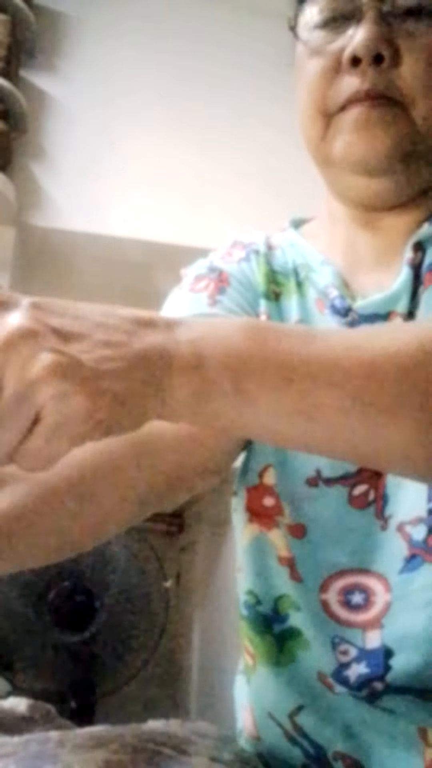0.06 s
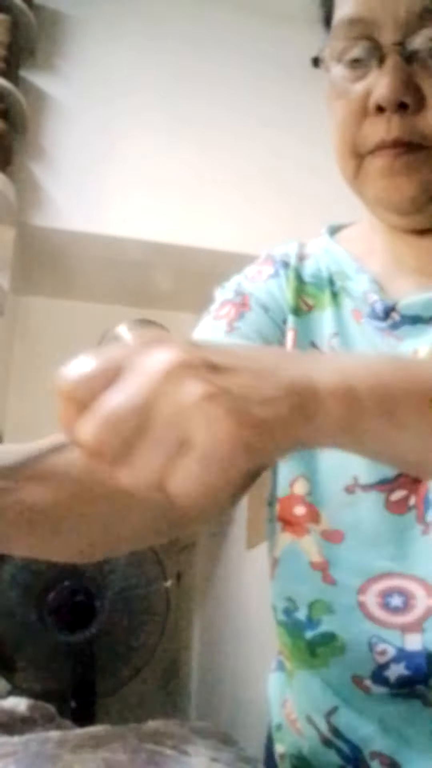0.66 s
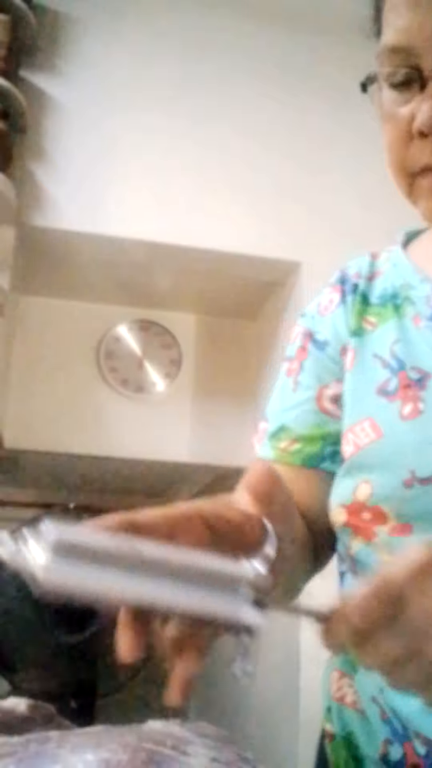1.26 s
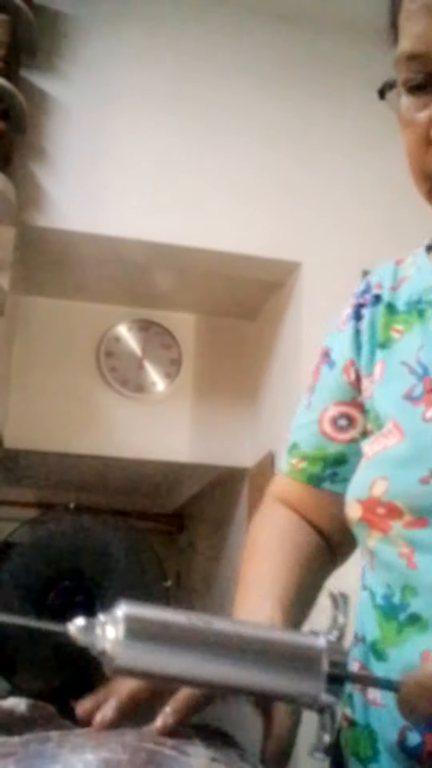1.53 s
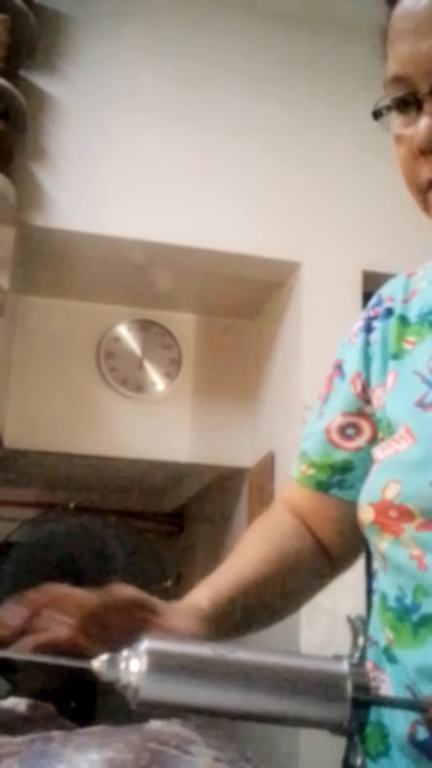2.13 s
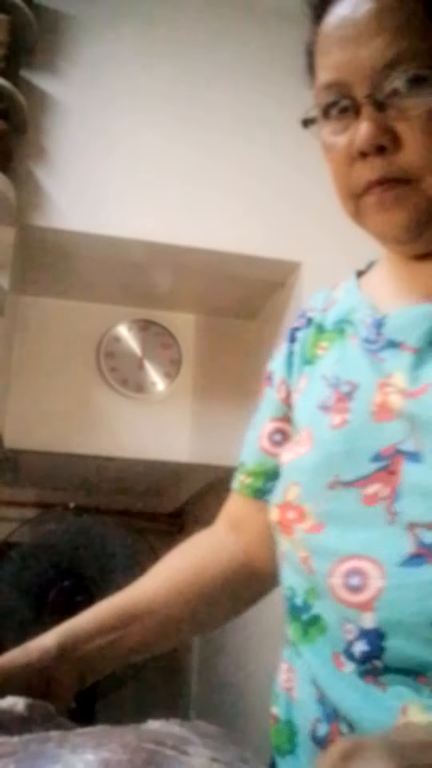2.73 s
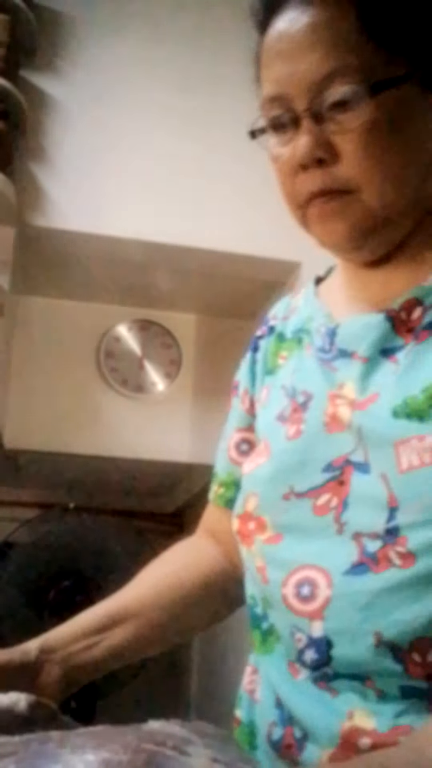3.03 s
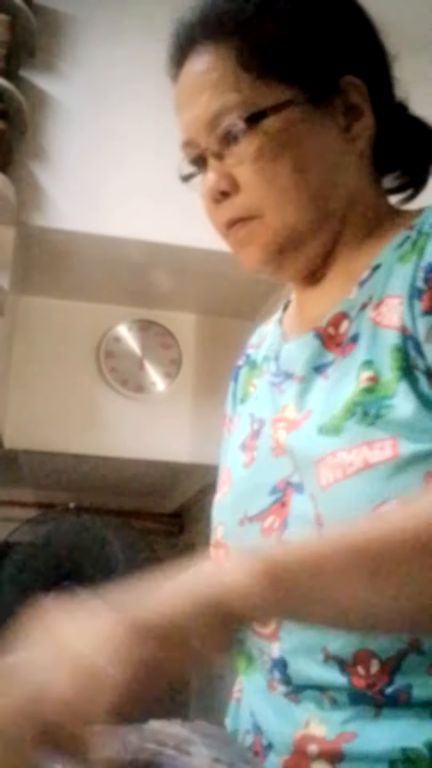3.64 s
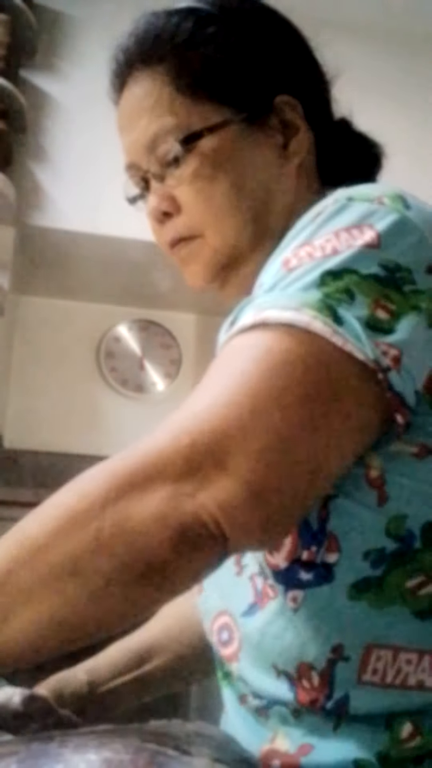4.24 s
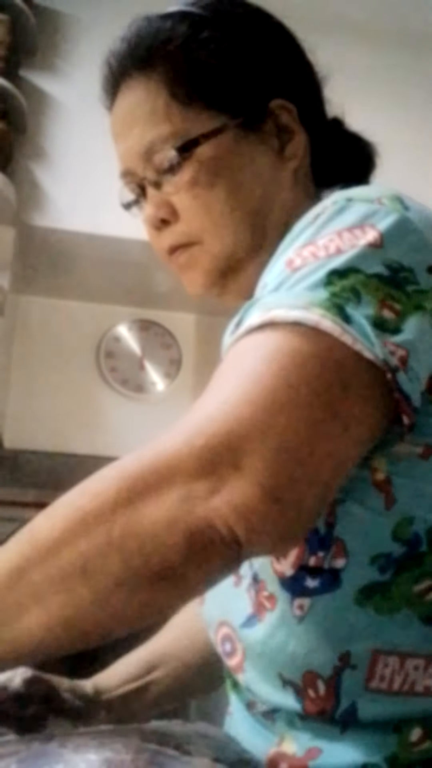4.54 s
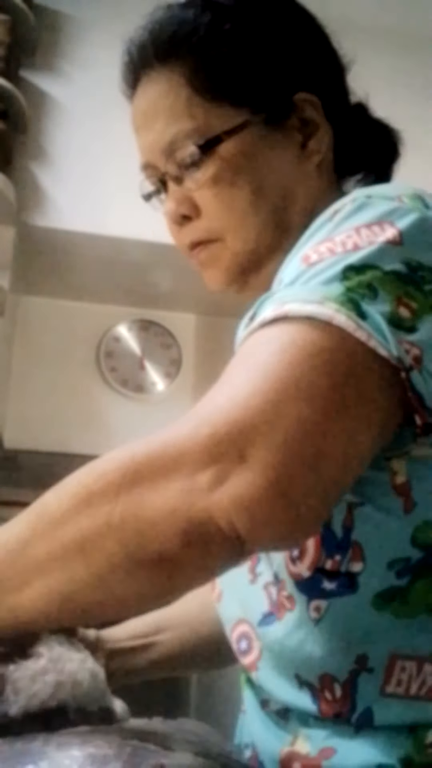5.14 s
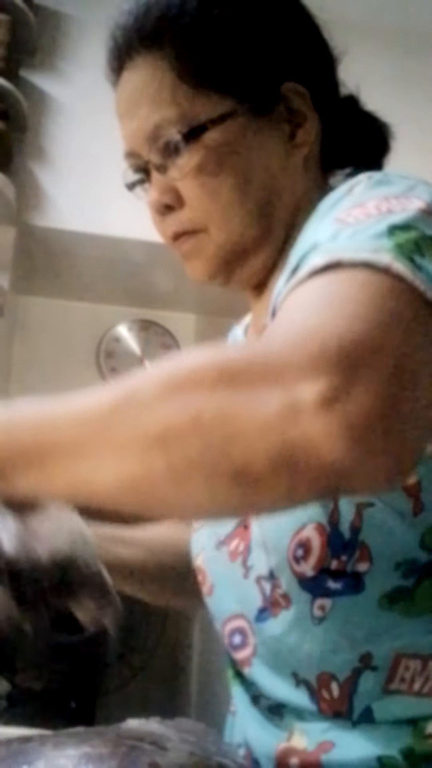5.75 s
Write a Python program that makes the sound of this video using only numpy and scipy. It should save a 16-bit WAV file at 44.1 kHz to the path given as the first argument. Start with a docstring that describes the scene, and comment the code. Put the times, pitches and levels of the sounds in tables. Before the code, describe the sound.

In a small kitchen, close to a phone microphone, a steel marinade injector gives a short, sputtering squirt into meat, then a faint squeak and a soft thud. After a pause it is laid on the counter with three sharp, ringing clacks, a short slide and light bumps. A hand faintly brushes the wet meat. An electric fan hums throughout under a high hiss.

```python
"""A steel marinade injector, close to a phone on the counter of a small kitchen.
The plunger drives a sputter of air and liquid through the needle, which squeaks in the meat, and thuds
home. Later the injector is laid down to the left with three sharp clacks, a short slide and a few light
bumps, and a hand brushes the wet meat. The hard walls ring for about half a second. An electric fan hums
throughout, under a high hiss that swells after the loud sounds and at times carries a thin whine."""
import sys
import numpy as np
from scipy import signal
from scipy.fft import rfft, irfft
from scipy.io import wavfile
from scipy.ndimage import uniform_filter1d, map_coordinates

SR = 44100
rng = np.random.default_rng(int(sys.argv[2]) if len(sys.argv) > 2 else 0)


def transcribe(u):
    """Save the signal u as a 16-bit wav file named by the first command-line argument.

    u: samples, shape (n,) or (channels, n), limited to [-1, 1]; the rate is SR.
    q: integer samples, one column per channel.
    """
    v = np.clip(np.atleast_2d(u).T, -1, 1)
    q = np.round(v * 32767).astype(np.int16)
    wavfile.write(sys.argv[1], SR, q)


N = 254898
TIME = np.arange(N) / SR
FREQ = np.maximum(np.fft.rfftfreq(2 * N, 1 / SR), 1e-3)


def amp(db):
    """Decibels to gain."""
    return 10 ** (np.asarray(db) / 20)


def unit_rms(x):
    """Scale to rms 1."""
    return x / np.std(x)


def eq_curve(rows):
    """Gain over frequency from (freq_hz, level_db) rows."""
    hz, db = np.transpose(rows)
    return amp(np.interp(np.log(FREQ), np.log(hz), db))


def resonances(rows):
    """Response of (pitch_hz, width_hz, level_db) modes; neighbours swing in opposite directions."""
    return sum((-1) ** k * amp(db) / (1 + 1j * hz / width * (FREQ / hz - hz / FREQ))
               for k, (hz, width, db) in enumerate(rows))


def low_pass(hz):
    """Response of a third-order low-pass."""
    s = 1j * FREQ / hz
    return 1 / ((1 + s) * (1 + s + s ** 2))


def filtered(x, response):
    """Pass a sound through a frequency response."""
    return irfft(rfft(x, 2 * N) * response)[..., :N]


def noise(response):
    """Noise whose density per root Hz is the given response."""
    return filtered(rng.standard_normal(N), response) * np.sqrt(SR / 2)


def drift(rate_hz):
    """Smooth random movement with a spread of about 1."""
    knots = rng.standard_normal(2048)
    return map_coordinates(knots, [TIME * rate_hz], order=2, mode="wrap")


def impulse(start_s, db):
    """Spectrum of one instantaneous push; as a filter, a delay with gain."""
    return amp(db) * np.exp(-2j * np.pi * FREQ * start_s)


def noise_burst(t60_s, attack_s):
    """Flat spectrum of a dense train of small pulses that builds up and dies away; energy 1."""
    t = TIME[:SR]
    rise = 1 - np.exp(-(t / attack_s) ** 2)
    burst = rfft(rng.standard_normal(SR) * amp(-60 * t / t60_s) * rise, 2 * N)
    return burst / np.sqrt(uniform_filter1d(np.abs(burst) ** 2, size=4000))


def envelope(start_s, attack_s, hold_s, t60_s, sag_db_per_s=0):
    """Gain that rises, holds (perhaps sagging) and dies away."""
    held_s = TIME - start_s - attack_s
    fall_db = sag_db_per_s * np.maximum(held_s, 0) + 60 * np.maximum(held_s - hold_s, 0) / t60_s
    return np.clip((TIME - start_s) / attack_s, 0, 1) * amp(-fall_db)


def with_send(sound, send_db):
    """Split a sound into two rows: direct and reverb send."""
    return sound * amp([[0], [send_db]])


# motor hum: pitch_hz, level_db, drift_hz
MOTOR_TONES = [(61, -89.5, 2.54), (118, -91.5, 2.1), (238, -78, 1.62), (367.3, -78, 0.93),
               (479, -69.5, 0.59)]
# air moved by the blades: freq_hz, density_db
BLADE_RUSH = [(25, -115), (70, -111), (170, -116), (205, -103), (250, -93), (320, -92), (400, -95.5),
              (500, -97), (660, -104), (1300, -112), (4000, -135)]


def fan(pan_db=0.47):
    """Motor tones drift a little in pitch over the rush of the blades, nearly centred in stereo."""
    hum = sum(np.sqrt(2) * amp(db) * np.sin(2 * np.pi * np.cumsum(hz + drift_hz * drift(16)) / SR)
              for hz, db, drift_hz in MOTOR_TONES)
    return (hum + noise(eq_curve(BLADE_RUSH))) * amp([[pan_db], [-pan_db]])


# microphone noise floor: freq_hz, left_density_db, right_density_db
MIC_HISS = [(30.8, -117, -108), (198, -114, -114), (436, -99, -106), (1120, -99, -103), (2410, -99.5, -106),
            (3950, -99.5, -108), (5660, -107, -110), (6360, -100, -104), (6925, -85, -99),
            (8240, -83.5, -94.5), (8170, -88, -90.5), (10210, -96, -91.5), (11110, -105, -102),
            (11960, -109, -108), (13800, -112, -112), (14400, -140, -140)]


def hiss():
    """Each of the two microphones hisses on its own; returns left and right."""
    return np.array([noise(eq_curve([(row[0], row[1 + side]) for row in MIC_HISS])) for side in (0, 1)])


# pipe resonances of needle and barrel: pitch_hz, width_hz, level_db
PIPE_MODES = [(744, 81, 5.5), (980, 140, -0.5), (2020, 120, 12.5), (2520, 46, -2), (3044, 110, 9),
              (3800, 160, 4.5), (4010, 160, 9), (4600, 2400, -0.5), (6900, 600, 8), (7980, 420, 11),
              (10700, 570, 2), (11600, 490, 2.5), (13700, 720, -5)]


def squirt(start_s=0.211, level_db=-34, sputter_db=2, grain_db=4.5, low_cut_hz=400, opening_s=0.093):
    """Air and droplets sputter through the needle and ring its pipe resonances."""
    jet = rng.standard_normal(N) * amp(sputter_db * drift(164.3) + grain_db * rng.standard_normal(N))
    tone = resonances(PIPE_MODES) * low_pass(13000) / (1 + (low_cut_hz / FREQ) ** 2)
    pipe = unit_rms(filtered(jet, tone))
    # the jet starts thin; its lows open up as the liquid clears
    lows = filtered(pipe, np.abs(low_pass(2600)) ** 2)
    opening = amp(np.interp(TIME - start_s, [0, opening_s], [-7, 0]))
    # the stroke holds while the thumb presses; a trickle leads it and runs on as the pressure fades
    stroke = envelope(start_s, attack_s=0.024, hold_s=0.085, t60_s=0.068)
    trickle = amp(-9.5) * envelope(start_s=0.1985, attack_s=0.006, hold_s=0.14, t60_s=0.56)
    flow = amp(level_db) * np.maximum(stroke, trickle)
    return with_send((pipe - lows + lows * opening) * flow, send_db=-4)


# air spitting out of the needle: start_s, level_db, pitch_hz, width_hz
AIR_POCKETS = [(.2415, -8, 2040, 500), (.2942, -2, 7700, 200), (.2978, -4, 2020, 450),
               (.3027, -5, 2100, 600), (.3078, 0, 4530, 400), (.309, -4, 6800, 250),
               (.3143, -11, 4000, 3000), (.3152, -2, 1980, 900), (.3265, -7, 1400, 1500),
               (.3412, -15, 1000, 1500), (.3535, -13, 2300, 1500), (.362, -5, 2660, 1100),
               (.367, -2, 750, 300)]


def spits():
    """Each air pocket pops at its own pitch and rings the nearest modes of needle and barrel."""
    pops = sum(impulse(start_s, db) * resonances([(hz, width_hz, 0)])
               for start_s, db, hz, width_hz in AIR_POCKETS)
    return with_send(irfft(pops * resonances(PIPE_MODES))[:N], send_db=-12)


# colour of the swelling hiss: freq_hz, level_db
SWELL_EQ = [(6300, -17), (6900, 12), (7500, 10.5), (8100, 20.5), (8600, -58), (9500, -74)]
# swells, cued to follow the loud sounds: start_s, level_db
SWELL_CUES = [(.29, -44), (2.94, -43), (3.39, -41.5)]


def hiss_swells():
    """A high band of hiss rises, sags slowly and fades."""
    gain = sum(amp(db) * envelope(start_s, attack_s=0.063, hold_s=0.398, t60_s=0.27, sag_db_per_s=16.5)
               for start_s, db in SWELL_CUES)
    return unit_rms(noise(eq_curve(SWELL_EQ))) * gain


def squeak(pitch_hz=3880, width_hz=260, level_db=-69.5, waver_db=5.0):
    """The needle shifts in the meat after the stroke and rubs with one thin, uneven ring."""
    ring = unit_rms(noise(resonances([(pitch_hz, width_hz, 0)]) ** 2))
    rub = ring * amp(level_db + waver_db * drift(41.7))
    return with_send(rub * envelope(start_s=0.46, attack_s=0.03, hold_s=0.16, t60_s=0.18), send_db=-6)


# soft contacts: start_s, level_db, send_db
THUD_HITS = [(.526, -5.5, -6.5), (3.295, -10.5, -2.5), (3.424, -2.5, -9.5)]
# body of the counter: pitch_hz, width_hz, level_db
COUNTER_MODES = [(263, 44, 8), (333, 63, 2.5), (470, 33, 2.5), (807, 87, 4.5), (2090, 180, 17)]


def thuds(cutoff_hz=850):
    """Soft contacts ring mainly the low modes of the counter."""
    force = sum(with_send(impulse(start_s, db), send_db) for start_s, db, send_db in THUD_HITS)
    return irfft(force * resonances(COUNTER_MODES) * low_pass(cutoff_hz))[:, :N]


# entries of the thin whine: start_s, hold_s, level_db
WHINE_CUES = [(1.269, 0.15, -49), (1.88, .01, -50), (2.547, 0.088, -54)]


def whine(pitch_hz=7690, width_hz=40):
    """A band of hiss, so narrow that it sounds as a high tone, comes and goes."""
    gain = sum(amp(db) * envelope(start_s, attack_s=0.078, hold_s=hold_s, t60_s=0.24)
               for start_s, hold_s, db in WHINE_CUES)
    return unit_rms(noise(resonances([(pitch_hz, width_hz, 0)]) ** 2)) * gain


# the injector hits the counter with its barrel (part 0), needle (1) or handle (2):
# start_s, level_db, part, cutoff_hz, chatter_db, send_db
CLACK_HITS = [(2.8197, 0.5, 0, 11600, -13, -0.5), (2.9643, -23, 1, 14000, -8, -10),
              (2.9675, -7, 1, 11000, -4, 3.5), (2.988, -5.5, 0, 903, -12, -2),
              (3.2887, -20.5, 2, 3630, 0.5, 8.5), (3.4125, -7, 1, 3130, 11.5, -10),
              (3.4163, 1.5, 2, 14200, -3.5, 0), (3.4209, -4, 2, 2200, -25, -31),
              (3.638, -29, 2, 4200, -3, 9)]
# its modes by part struck; the narrow ones clink on: pitch_hz, width_hz, barrel_db, needle_db, handle_db
STEEL_MODES = [(444, 100, -2, -24, -2), (852, 39, 9, -22, 14.5), (1106, 83, 6.5, 1, 7.5),
               (1290, 64, -8, -11, 14), (1746, 95, 9.5, -16, 17), (1945, 75, 9, 10.5, 24),
               (2480, 140, 1, -1, 15), (2500, 7.9, 8, 0, 22), (2985, 7.4, 12, 0, 18.5),
               (3070, 150, 20.5, -18, 18), (3152, 5.6, 23, 0, 21), (3207, 5.4, 16, 0, 16),
               (3550, 240, 0, 10, 10), (3940, 110, -4, 16.5, 16), (4810, 150, 12, 14, 0),
               (5640, 290, 5, 4, 7), (6900, 120, 5, 11, 11), (7740, 255, 6.5, 24.5, 10),
               (7940, 210, -4, 21.5, 14.5), (10180, 120, -10, -2, 0.5), (14500, 1200, -24, -22, -5)]
# what it radiates into the room, by part struck: freq_hz, barrel_db, needle_db, handle_db
STEEL_SEND_EQ = [(200, -27, -28, -7.5), (494, -1.5, -10, 1), (650, -6.5, -8, -15), (880, 4.5, -7.5, 5.5),
                 (1120, 10, -2, 6), (1430, 7.5, -18, 6), (1920, 10, 2.5, 10.5), (2450, 8, 2, 12),
                 (3180, 17.5, -4, 9.5), (3500, 9.5, 10, 11), (3940, 5, -2, 12), (5000, 6, 0, 5.5),
                 (6100, -4, -3, 0.5), (7600, 9.5, -2, 8), (9900, -14, -9, -7.5), (14000, -10, -22.5, -15)]


def clacks(chatter_cycles=120, crack_hz=2700, crack_width_hz=1800, crack_db=3):
    """Each hit cracks, chatters and rings the modes its contact point favours; the send is smoother."""
    rings = [resonances([(row[0], row[1], row[2 + part]) for row in STEEL_MODES]) for part in range(3)]
    send_eqs = [eq_curve([(row[0], row[1 + part]) for row in STEEL_SEND_EQ]) for part in range(3)]
    crack = noise_burst(t60_s=0.012, attack_s=0.00023)
    crack *= resonances([(crack_hz, crack_width_hz, crack_db)])
    spectrum = 0
    for start_s, db, part, cutoff_hz, chatter_db, send_db in CLACK_HITS:
        force = impulse(start_s, db) * low_pass(cutoff_hz)
        # the softer the hit, the longer it chatters
        chatter = amp(chatter_db) * noise_burst(t60_s=chatter_cycles / cutoff_hz, attack_s=0.00078)
        direct = (1 + chatter) * rings[part] + crack
        spectrum += force * np.array([direct, amp(send_db) * send_eqs[part]])
    return irfft(spectrum)[:, :N]


def slide(level_db=-57.5, cutoff_hz=1300):
    """The handle rubs on the counter and rings softly before it drops."""
    handle = resonances([(hz, width_hz, handle_db) for hz, width_hz, _, _, handle_db in STEEL_MODES])
    rub = unit_rms(noise(handle * low_pass(cutoff_hz)))
    gain = amp(level_db) * envelope(start_s=3.203, attack_s=0.0065, hold_s=0.061, t60_s=0.09)
    return with_send(rub * gain, send_db=2)


# touches of the hand: peak_s, level_db, spread_s, low_cut_hz
BRUSH_STROKES = [(4.707, -49.5, 0.028, 2200), (4.9, -56, 0.0084, 8000), (5.092, -53, 0.005, 8000)]
# skin on wet meat: pitch_hz, width_hz, level_db
SKIN_MODES = [(3420, 450, 6.5), (4070, 700, 1.5), (7800, 350, 18), (13000, 1400, -8)]


def brushes(grain_db=5):
    """Short, fine crackles of skin on wet meat; a firm stroke has body, a light one only treble."""
    crackle = rng.standard_normal(N) * amp(grain_db * drift(300))
    skin = resonances(SKIN_MODES)
    sound = 0
    for peak_s, db, spread_s, low_cut_hz in BRUSH_STROKES:
        texture = unit_rms(filtered(crackle, skin / (1 + (low_cut_hz / FREQ) ** 4)))
        fade = np.exp(-0.5 * ((TIME - peak_s) / spread_s) ** 2)
        sound += amp(db) * fade * texture
    return with_send(sound, send_db=0)


def placed(direct, send, lag_s, right_db):
    """A source to the left reaches the right microphone later and weaker; returns left, right, send."""
    return np.array([direct, filtered(direct, impulse(lag_s, right_db)), send])


# kitchen reverb by band: freq_hz, t60_s, level_db
REVERB_BANDS = [(149, 0.56, 10), (412, 0.45, 8), (1060, 0.82, -5.5), (2870, 0.52, -5.5), (4770, 0.5, -5),
                (6300, 1, -5), (9600, 0.68, -2.5), (11600, 0.18, -13)]
# how the phone shades its right microphone: freq_hz, gain_db
RIGHT_MIC_EQ = [(150, -3), (400, -13.5), (1500, -3.5), (3000, -11.5), (5000, -7.5), (7500, -12),
                (8800, -21), (9800, 12), (14000, -4.5)]


def kitchen(left, right, send, scatter_db=-16, wall_s=0.0181, wall_db=-7, wall_hz=3170, width_hz=550):
    """Direct sound, scatter off the counter, one clear wall echo and a diffuse tail, in stereo."""
    centres = np.log([row[0] for row in REVERB_BANDS])
    bands = [np.sqrt(np.interp(np.log(FREQ), centres, peak)) for peak in np.eye(len(centres))]
    echo = impulse(wall_s, wall_db) * resonances([(wall_hz, width_hz, 0)])
    mics = []
    for direct in (left, right):
        tail = sum(noise_burst(t60_s, attack_s=0.0053) * amp(db) * band
                   for (_, t60_s, db), band in zip(REVERB_BANDS, bands))
        scatter = amp(scatter_db) * noise_burst(t60_s=0.0095, attack_s=0.003)
        early = filtered(left, (scatter + echo) * low_pass(12400))
        mics.append(direct + early + filtered(send, tail))
    return np.array([mics[0], filtered(mics[1], eq_curve(RIGHT_MIC_EQ))])


def scene(low_cut_hz=195, flicker_db=0.5):
    """All handling sounds share the kitchen and have no deep bass; fan and hiss lie under them."""
    at_meat = placed(*(squirt() + spits() + squeak() + brushes()), lag_s=0.000413, right_db=-4.0)
    set_down = placed(*(clacks() + slide()), lag_s=0.000207, right_db=-7.5)
    counter = placed(*thuds(), lag_s=0, right_db=-4.5)
    handling = kitchen(*(at_meat + set_down + counter))
    low_cut = signal.butter(7, low_cut_hz, "high", fs=SR, output="sos")
    mix = signal.sosfilt(low_cut, handling) + fan()
    hiss_bed = hiss()
    hiss_bed[0] += hiss_swells() + whine()  # left only
    return mix + hiss_bed * amp(flicker_db * drift(25))


def record(dry, top_hz=15800):
    """The phone cuts the top."""
    return signal.sosfilt(signal.ellip(8, 0.2, 70, top_hz, fs=SR, output="sos"), dry)


dry = scene()
out = record(dry)
transcribe(out)
```